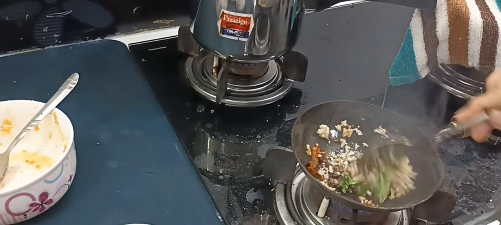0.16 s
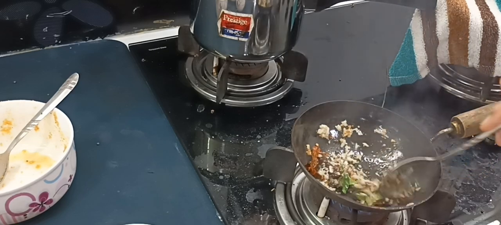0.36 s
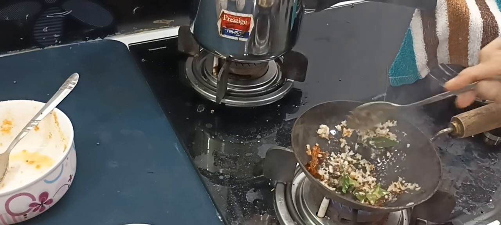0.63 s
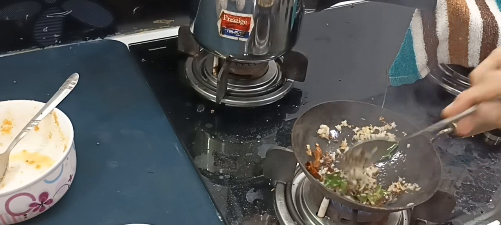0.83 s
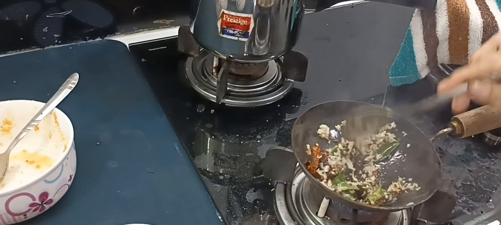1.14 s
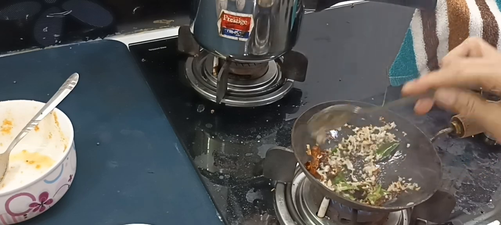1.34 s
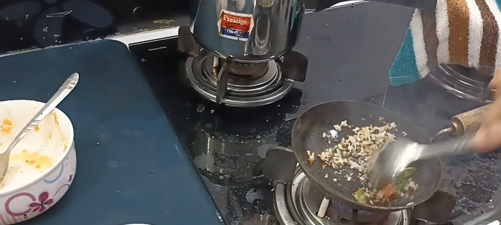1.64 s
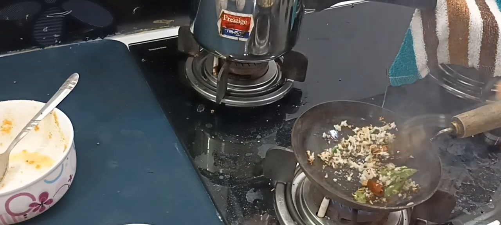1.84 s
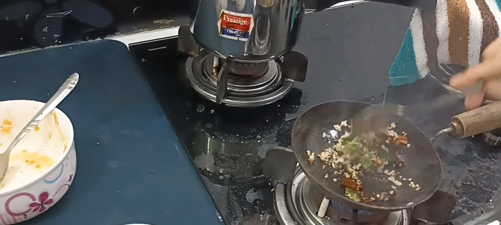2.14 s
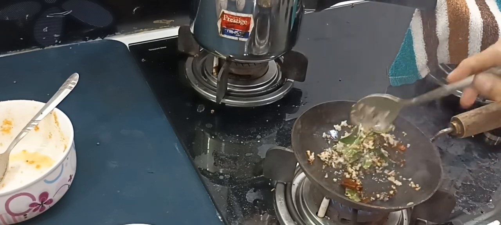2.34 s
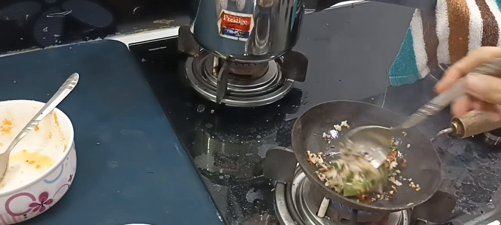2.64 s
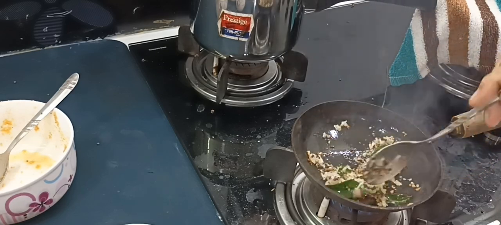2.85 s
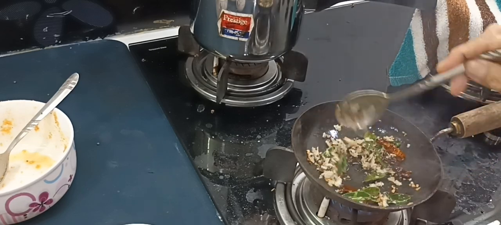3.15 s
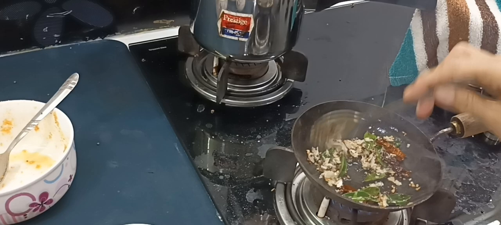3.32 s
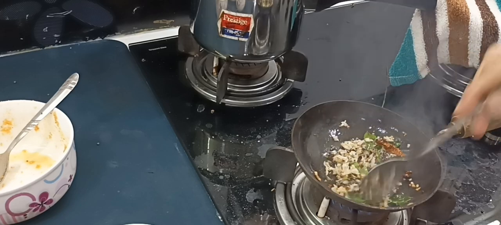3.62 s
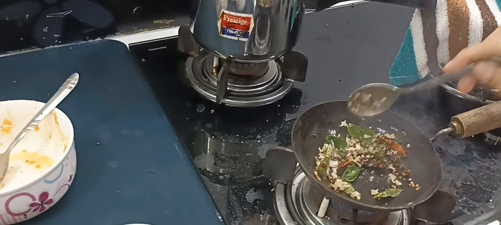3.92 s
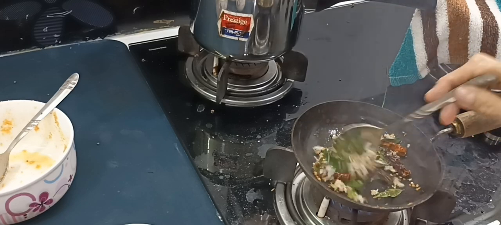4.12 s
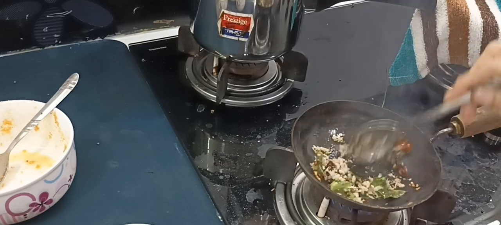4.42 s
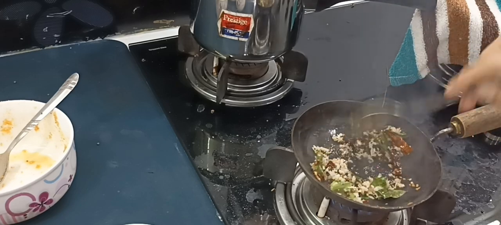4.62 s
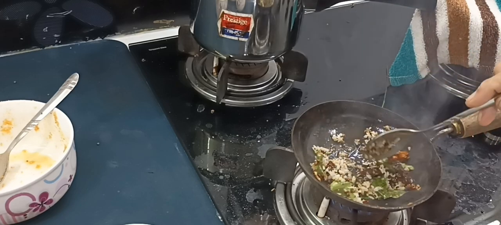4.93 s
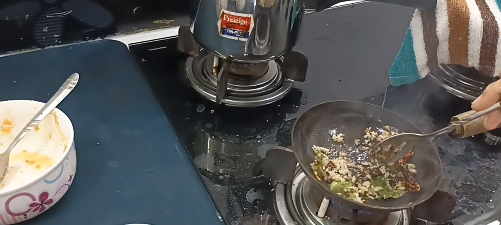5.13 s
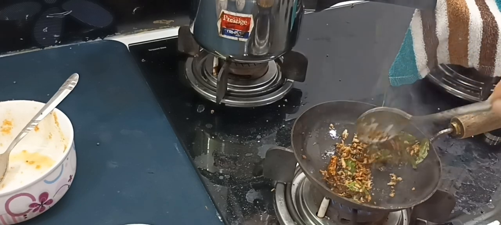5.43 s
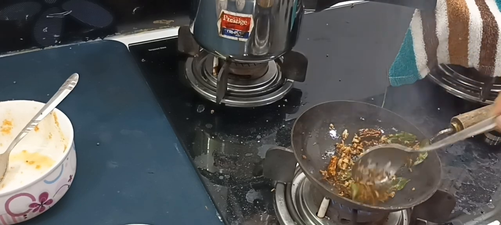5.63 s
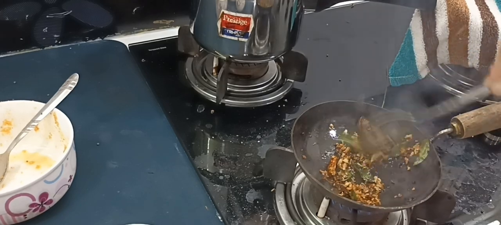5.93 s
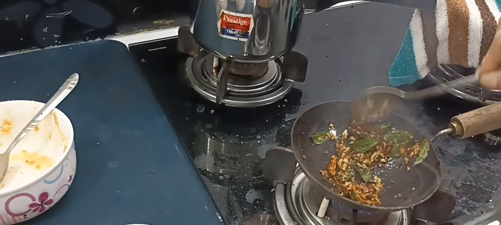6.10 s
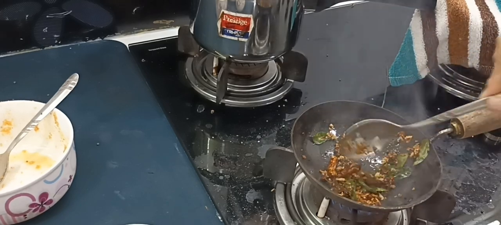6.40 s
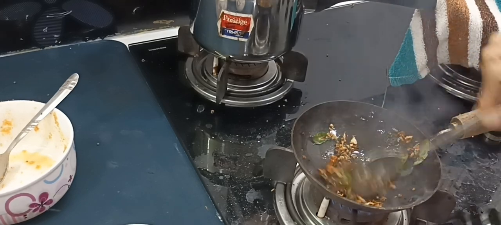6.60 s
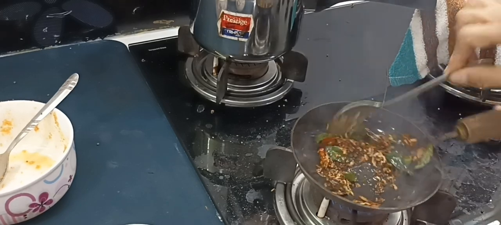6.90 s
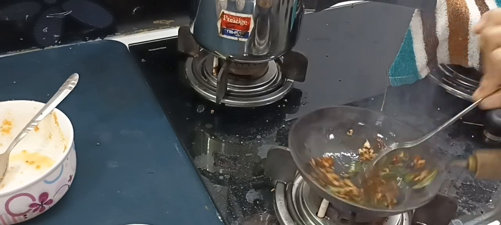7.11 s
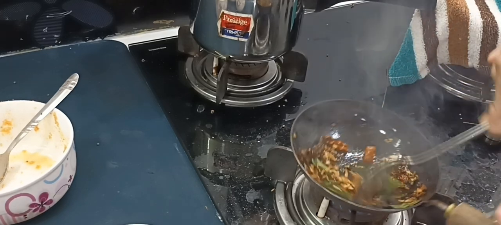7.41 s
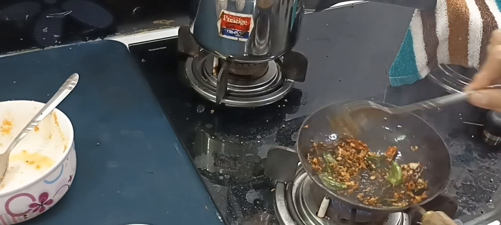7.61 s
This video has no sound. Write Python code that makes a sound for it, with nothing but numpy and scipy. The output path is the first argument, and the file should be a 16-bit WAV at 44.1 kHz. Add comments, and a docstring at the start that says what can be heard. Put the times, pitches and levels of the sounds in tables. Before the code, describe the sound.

Seeds pop and crackle in hot oil from start to finish, heard very close in a small kitchen. The cracks are bright, sharp and irregular, several each second, the louder ones trailing a short hiss over a fine sizzle and a faint gas flame. A steel spoon taps and scrapes the small pan in short ringing strokes, near the start, around 1.3 seconds, often between 2 and 4 seconds, and again at 6 seconds. Soft, low thuds and rattles come from the pan rocking on the stove. Brief hisses of steam rise at about 1, 1.4, 3.6, 5.4 and 5.9 seconds. The hardest pops, at about 4.2, 5.3, 6.3 and 7 seconds, overload the microphone with a crack and a dull thump. From 6.7 seconds the pan grinds and clanks over the grate, with a sharp spoon strike near 7.7 seconds.

```python
"""Seeds frying in a small pan

A tiled kitchen, a phone's two microphone ports close to a gas burner. Seeds crack and throw oil that
hisses as it lands; wet aromatics vent steam. A steel spoon taps and scrapes, the hob thuds, and near
the end the pan grinds over the grate. The ports ring near 10 kHz; the hardest pops overload them
and duck the limiter."""
import sys
import numpy as np
from scipy import signal
from scipy.fft import rfft, irfft
from scipy.io import wavfile
from scipy.ndimage import uniform_filter1d, minimum_filter1d

SR = 44100
rng = np.random.default_rng(int(sys.argv[2]) if len(sys.argv) > 2 else 0)


def persist_wave(psi):
    """Save psi, clipped to +-1, as 16-bit WAV."""
    counts = np.round(np.clip(psi, -1, 1) * 32767).astype(np.int16)
    wavfile.write(sys.argv[1], SR, np.atleast_2d(counts).T)


N = 341951
TIME = np.arange(N) / SR
HOB_HZ = 144  # the hob's low mode


def amp(db):
    """Decibels to amplitude."""
    return 10 ** (np.asarray(db) / 20)


def unit(x):
    """Scale to rms 1."""
    return x / np.sqrt(np.mean(x ** 2) + 1e-20)


def add(track, start_s, sound):
    """Mix a sound into a track."""
    i = max(int(start_s * SR), 0)
    track[..., i:i + sound.shape[-1]] += sound[..., :max(N - i, 0)]


def colour(x, points, size=1024):
    """Minimum-phase filter of unit power gain, shaped by (freq_hz, level_db) points."""
    hz, db = np.transpose(points)
    bins_hz = np.arange(size + 1) * SR / 2 / size
    log_gain = np.log(amp(np.interp(np.log(bins_hz + 1), np.log(hz), db)))
    cepstrum = irfft(log_gain)[:size]
    cepstrum[1:] *= 2
    response = irfft(np.exp(rfft(cepstrum, 2 * size)))[:size]
    response = np.array(response / np.linalg.norm(response), ndmin=x.ndim)
    return signal.oaconvolve(x, response, axes=-1)[..., :x.shape[-1]]


def resonate(x, hz, width_hz):
    """One resonance, gain 1 at its centre."""
    return signal.lfilter(*signal.iirpeak(hz, hz / width_hz, fs=SR), x)


def noise_band(hz, width_hz):
    """Noise passed twice through one resonance, rms 1."""
    return unit(resonate(resonate(rng.standard_normal(N), hz, width_hz), hz, width_hz))


def ring(x, modes, spread_db=2):
    """Ring a set of modes at unit power gain; their strengths depend on the point of contact."""
    longest_s = max(t60 for *_, t60 in modes)
    t, response = TIME[:int(SR * min(longest_s, .4))], 0
    for (hz, db, t60), (size, phase, lead) in zip(modes, rng.standard_normal((len(modes), 3))):
        angle = 2 * np.pi * (hz * t + phase) + np.array([[0], [lead]])  # out of step at the two ports
        decay = amp(db + spread_db * size - 60 * t / t60) / np.sqrt(t60)
        response = response + decay * np.sin(angle)
    return signal.oaconvolve(x[None], unit(response) / np.sqrt(len(t)), axes=-1)[:, :len(x)]


def wander(per_s):
    """A random line that turns per_s times a second, rms 1."""
    step = int(SR / per_s)
    stairs = np.repeat(rng.standard_normal(N // step + 2), step)
    return unit(uniform_filter1d(stairs, step)[:N])


def clicks(per_s, spread_db):
    """Random clicks, many small and a few large, rms 1."""
    chance, sign = rng.random(N) * SR / per_s, rng.choice([-1., 1.], N)
    at, out = chance < 1, np.zeros(N)
    out[at] = sign[at] * amp(spread_db * np.minimum(-np.log(chance[at]), 6))
    return unit(out)


def scattered(per_s, spread_db, apart=1.0):
    """Clicks from all over the pan: the ports share some and hear others alone."""
    shared = clicks(per_s, spread_db)
    alone = np.array([clicks(per_s, spread_db) for _ in range(2)])
    return unit(shared + apart * alone)


def leftward(db):
    """Port gains: the left faces the stove, the right is db quieter."""
    return np.array([[1], [amp(-db)]])


def burner():
    """The gas flame's soft, steady rush."""
    # Flame spectrum: freq_hz, level_db
    flame_spectrum = [(25, -8.5), (60, -5.5), (140, 1), (250, -4), (500, -4), (900, -15), (2000, -18.5),
                      (6000, -64), (16000, -30)]
    noise = rng.standard_normal(N) + .5 * rng.standard_normal((2, N))
    return colour(noise, flame_spectrum) * amp(-52.5 + 0.073 * wander(5.6)) * leftward(4.9)


def sizzle(bursts, rise_s=0.07, fall_s=0.087, simmer_db=-45, opening_db=-37):
    """Tiny bubbles burst all the time; oil thrown by each pop lands and boils off."""
    # Spectrum of bubbling oil: freq_hz, level_db
    oil_spectrum = [(200, -21), (1000, -9.5), (2500, 0.5), (5000, 2.5), (8000, 1.5), (10000, 2),
                    (13000, 0.5), (16000, -2.5)]
    t = TIME[:SR]
    power = (amp(opening_db) * np.exp(-TIME / fall_s)) ** 2  # oil already in the air at the start
    for start_s, *_, hiss_db in bursts:
        spray = amp(hiss_db) * (1 - np.exp(-t / rise_s)) * np.exp(-t / fall_s)
        add(power, start_s, spray ** 2)
    boil = np.sqrt(power + amp(simmer_db + 0.38 * wander(3.7)) ** 2)
    # bubbles come in clusters, and a few are large enough to tick alone
    bubbles = scattered(per_s=14000, spread_db=2.2) * amp(1.8 * wander(45))
    ticks = amp(-14.5) * scattered(per_s=450, spread_db=2)
    return colour((bubbles + ticks) * boil, oil_spectrum) * leftward(3.35)


def droplets():
    """Lone droplets spit; the bigger they are, the lower they tick."""
    sizes = [(3000, 31, -59.5), (6000, 110, -61), (9100, 70, -54)]  # pitch_hz, rate_per_s, level_db
    spits = 0
    for hz, per_s, db in sizes:
        ticks = scattered(per_s, spread_db=3.4, apart=0.81)
        spits = spits + amp(db) * unit(resonate(ticks, hz, hz / 2))
    return spits * leftward(8)


def spoon(attack_share=0.015, knock_s=0.0046, tap_s=0.011, chatter_db=3, chatter_per_s=260):
    """The spoon's edge knocks on the pan, then sticks and slips over it, ringing both."""
    # Each stroke bites, then drags on lightly and sings (drag_db is relative to the bite):
    # start_s, bite_s, spoon_db, pan_db, drag_s, drag_db, sing_hz, sing_db
    strokes = [(0.069, 0.012, -20.5, -39.5, 0.13, -13.5, 6530, 0),
               (0.327, 0.012, -25.5, -57, 0.019, -14, 6360, 6),
               (0.368, 0.011, -18, -30.5, 0.021, -21, 6400, 8),
               (1.252, 0.0095, -24, -34.5, 0.17, -22, 6410, -1),
               (1.882, 0.019, -49, -38.5, 0.038, -3.5, 6430, -6),
               (2.295, 0.12, -40, -49, .16, -1, 5800, -5), (2.403, 0.02, -25, -58, 0.2, -22.5, 6400, 5),
               (2.874, 0.003, -27.5, -61, 0.028, -8, 6600, -9),
               (2.935, 0.019, -20, -38, 0.13, -17.5, 6520, 0),
               (3.225, 0.014, -18.5, -31, 0.073, -15.5, 10140, -7),
               (3.29, 0.017, -25.5, -40, 0.016, -1.5, 8900, 0),
               (3.314, 0.0025, -17.5, -27, 0.0075, -25, 10400, -8),
               (3.912, 0.02, -14.5, -29, 0.14, -18, 6400, -4),
               (6.056, 0.017, -38, -31, 0.041, -18, 8600, -4),
               (6.121, 0.057, -30.5, -40, 0.09, -6.5, 8450, -3),
               (6.15, 0.069, -25, -63, 0.056, -16, 11820, -6),
               (7.278, 0.0068, -22.5, -25.5, 0.0083, -3, 5170, 7),
               (7.292, 0.036, -39.5, -42.5, 0.29, -3, 10170, -4),
               (7.669, 0.01, -10, -20, 0.067, -19.5, 10015, 0)]
    # Spoon modes, damped by hand and food: pitch_hz, level_db, t60_s
    spoon_modes = [(5300, -6, 0.04), (5740, -7, 0.03), (6450, 0, 0.06), (6950, -7, 0.025), (7820, -4, 0.06),
                   (8280, -5, 0.035), (8450, -4, 0.035), (8720, -3, 0.025), (8930, -2, 0.035),
                   (9680, -3, 0.035), (10060, -1, 0.035), (10310, -1, 0.04), (10700, -1, 0.04),
                   (11080, -6, 0.02), (11830, 1, 0.03), (13340, -8, 0.03)]
    # Spectrum of the edge's rasp: freq_hz, level_db
    rasp_spectrum = [(500, -0.5), (2200, 2.5), (4400, 0), (5500, 8.5), (7500, 0.5), (9000, -3.5),
                     (11800, -2), (13000, -2), (16000, 0)]
    steel, bites, drags = np.zeros((2, N)), np.zeros(N), np.zeros(N)
    t = TIME[:SR // 3]
    slips = clicks(per_s=2900, spread_db=2) * amp(chatter_db * wander(chatter_per_s))
    for k, stroke in enumerate(strokes):
        start_s, bite_s, spoon_db, pan_db, drag_s, drag_db, sing_hz, sing_db = stroke
        contact = 1 - np.exp(-t / (attack_share * bite_s))  # long strokes lean in softly
        bite = contact * np.exp(-(t / bite_s) ** 3)
        drag = contact * np.exp(-(t / drag_s) ** 3) * amp(drag_db)
        pressure = np.maximum(bite, drag)
        rub = unit(slips[k * SR // 10:][:len(t)] * pressure)
        knock = unit(rng.standard_normal(len(t)) * np.exp(-t / knock_s))
        knock *= amp(15) * np.exp(-bite_s / tap_s)  # the shorter the bite, the more of it is knock
        force = unit(rub + knock) * np.sqrt(np.mean(pressure ** 2))
        scrape = amp(-3) * (ring(force, spoon_modes) + colour(force, rasp_spectrum)) * leftward(6.7)
        # a light edge sings more readily than a hard-pressed one
        song = squeal(sing_hz, len(t)) * amp(sing_db) * np.maximum(amp(-6) * bite, drag)
        add(steel, start_s, amp(spoon_db) * (scrape + song))
        add(bites, start_s, amp(pan_db + 1) * bite)
        add(drags, start_s, amp(pan_db + 6) * drag)
    # the bare edge wakes the pan's high modes; dragged through food it sounds hollow
    bright = pan_body(bites, slips_per_s=1200, tilt_db_per_octave=1.7, clatter_db=-6.5)
    hollow = pan_body(drags, slips_per_s=700, tilt_db_per_octave=-2.5, clatter_db=0)
    return steel + bright + hollow


def squeal(hz, samples, width_hz=120):
    """A narrow, unsteady tone while the spoon's edge keeps slipping in step with a mode."""
    tone = resonate(rng.standard_normal(SR // 2), hz, width_hz)
    return unit(tone[-samples:]) * leftward(8)


def pan_body(force, slips_per_s, tilt_db_per_octave, clatter_db, contacts=2, detune=0.0035):
    """A rough push rings the pan over a food-damped clatter; harder contact tilts the modes brighter."""
    # Pan modes: pitch_hz, level_db, t60_s
    pan_modes = [(377, 0.5, 0.3), (456.8, 4, 0.23), (505, 4, 0.096), (645.6, 2, 0.14), (723, -4, 0.077),
                 (766, -4, 0.11), (830, -6, 0.08), (980, -3, 0.048), (1178, -5.5, 1), (1204, -2.5, 0.1),
                 (1313, -4, 0.074), (1403, -4.5, 0.063), (1530, -3.5, 0.038), (1660, -3, 0.11),
                 (2064, -0.5, 0.046), (2144, -1.5, 0.017), (2254, -5, 0.04), (2394, -8.5, 0.04),
                 (2565, -6.5, 0.043), (3074, -3, 0.053), (3325, -8.5, 0.077), (3446, -11.5, 0.042),
                 (3850, -8, 0.033), (4270, -11, 0.07), (4370, -8, 0.039), (5160, -11, 0.028)]
    # Spectrum of the clatter: freq_hz, level_db
    clatter_spectrum = [(100, -47), (250, 1), (480, -2), (800, -2.5), (1300, -11.5), (1800, -4.5),
                        (2300, -33), (2800, -9), (4600, -28), (6000, -28), (16000, -30)]
    metal = 0
    # the load shifts between points of contact; each rings and detunes the modes differently
    for offsets in rng.standard_normal((contacts, len(pan_modes))):
        modes = [(hz * (1 + detune * offset), db + tilt_db_per_octave * np.log2(hz / 1000), t60)
                 for (hz, db, t60), offset in zip(pan_modes, offsets)]
        slips = unit(clicks(slips_per_s, spread_db=0) * amp(3 * wander(per_s=12)))
        metal = metal + ring(force * slips, modes) / np.sqrt(contacts)
    clatter = colour(force * scattered(per_s=2400, spread_db=3.5), clatter_spectrum)
    return (amp(1) * metal + amp(clatter_db) * clatter) * leftward(5.8)


def hob(push_s=0.012, rattle_s=0.013, lead_s=.008, scuff_db=-12):
    """Pushes of the spoon swing the hob's low mode and rattle the hollow pan on its grate."""
    # Pushes that rock the pan: time_s, level_db
    pushes = [(0.083, -46.5), (0.17, -49.5), (0.346, -48), (0.65, -50), (0.695, -50), (0.935, -55),
              (1.062, -42), (1.268, -48.5), (1.438, -48), (1.895, -38), (1.94, -46), (2.001, -47),
              (2.261, -38.5), (2.998, -41), (3.236, -33.5), (3.608, -39.5), (3.673, -40), (3.929, -41.5),
              (4.36, -38), (4.431, -49.5), (4.596, -40), (4.689, -52), (4.841, -57.5), (5.559, -49.5),
              (5.736, -41), (6.057, -45.5), (6.49, -48), (6.622, -45.5), (6.91, -38.5), (7.115, -38),
              (7.258, -40), (7.405, -39), (7.583, -32)]
    # Hollow resonances of the pan: pitch_hz, width_hz, level_db
    hollow = [(230.3, 14, -9.5), (308.7, 24, -5), (376, 37, -8), (477, 56, -4.5), (764, 250, -12)]
    t, swing, rattle = TIME[:SR // 4], np.zeros(N), np.zeros(N)
    thud_shape = t / push_s * np.exp(1 - t / push_s)
    rattle_shape = t / rattle_s * np.exp(1 - t / rattle_s)
    for (time_s, db), (detune, phase) in zip(pushes, rng.uniform(-0.93, 1, (len(pushes), 2))):
        tone = np.sin(2 * np.pi * HOB_HZ * (1 + 0.11 * detune) * t + np.pi * phase)
        add(swing, time_s - lead_s, amp(db) * thud_shape * tone)
        add(rattle, time_s - lead_s, amp(db) * rattle_shape)
    clatter = sum(amp(db) * noise_band(hz, width_hz) for hz, width_hz, db in hollow)
    scuff = pan_body(amp(scuff_db) * rattle, slips_per_s=550, tilt_db_per_octave=3, clatter_db=0)
    return amp(9) * swing * leftward(2.5) + rattle * clatter * leftward(5.8) + scuff


def seeds(small_count=50, spread_db=2.5):
    """The seeds that burst: loud ones at set times, small ones at random between them."""
    # Loud seeds (puff_db is relative to the crack): start_s, crack_db, puff_db, hiss_db
    loud = [(0.0775, -10.5, -15, -22), (0.167, -24.5, -11, -45), (0.2325, -23.5, -28, -28.5),
            (0.3087, -16, -21, -22), (0.331, -24.5, -3, -42), (0.355, -21, -5, -43),
            (0.3953, -5.5, -15.5, -27), (0.487, -24, -10, -42), (0.52, -24, -20, -40),
            (0.5402, -14, -9.5, -26.5), (0.6488, -24, -12, -29.5), (0.73, -29, -12, -49),
            (0.8202, -9, -14.5, -30), (0.8582, -20.5, -16.5, -31.5), (0.9137, -21.5, 1, -27),
            (1.119, -23.5, -24, -36), (1.2485, -15, -11, -29), (1.3984, -17.5, -5.5, -32),
            (1.4154, -20, -3.5, -42), (1.4786, -20, -5.5, -23), (1.707, -27.5, -8.5, -27),
            (1.7334, -23, -7, -26), (1.758, -24, -9, -45), (1.7668, -10, -5.5, -44), (1.856, -30, -10, -48),
            (1.918, -32, -20, -35), (2.0025, -26.5, -18, -35), (2.021, -31, -14, -45),
            (2.046, -27.5, -12, -47), (2.0793, -26, -11, -54), (2.1025, -9.5, -19.5, -30),
            (2.242, -30.5, -9, -35), (2.3375, -22.5, -21, -46), (2.3441, -21, -16, -35),
            (2.383, -26, -19, -45), (2.4867, -23, -6, -30), (2.5, -27, -18, -37), (2.5214, -20.5, -22, -52),
            (2.5966, -11.5, -15, -53), (2.812, -30.5, -11, -43), (2.9037, -19.5, -21, -28),
            (2.9654, -16.5, -19, -39), (3.1127, -24, -14.5, -38), (3.173, -31.5, -21, -35),
            (3.273, -24, -11, -40), (3.314, -11.5, -15, -29.5), (3.5379, -10.5, -13, -36),
            (3.549, -14.5, -19, -25.5), (3.652, -28.5, -19, -46), (3.8999, -15.5, -18, -24.5),
            (4.045, -30, -16, -40), (4.121, -32, -16, -51), (4.243, -5.5, -7, -18), (4.455, -30, -17, -37),
            (4.5281, -25, -17, -38), (4.577, -31, -7, -48), (4.6218, -11.5, -12, -44),
            (4.665, -31.5, -6, -30.5), (4.749, -35, -15, -50), (4.7873, -7, -20, -33),
            (4.91, -27.5, -31, -44), (4.9753, -21, -14, -32.5), (4.9868, -22.5, -10.5, -50),
            (5.009, -31, -12, -50), (5.1018, -29, -3.5, -29.5), (5.2287, -22, -4.5, -54),
            (5.2752, -1.5, -18, -24.5), (5.3859, -14, -1, -64), (5.4097, -21, -19, -33),
            (5.5379, -13, -15, -51), (5.695, -8.5, -5, -24.5), (5.831, -8, -4.5, -32), (6.266, -7, 0, -41),
            (6.2828, -6.5, -37, -22.5), (6.324, -29.5, -1.5, -29), (6.459, -27.5, -14, -53),
            (6.539, -31.5, -21, -45), (6.5789, -10, -15, -31.5), (6.6728, -9, -31, -31.5),
            (7.0418, -3, -15, -17.5), (7.4406, -7, -18, -24), (7.4577, -10, -20, -53)]
    starts_s = rng.random(small_count) * N / SR
    levels_db = np.array([-38, -14]) - spread_db * rng.standard_normal((small_count, 2))
    small = [(s, crack_db, puff_db, -64) for s, (crack_db, puff_db) in zip(starts_s, levels_db)]
    return list(loud) + small


def pops(bursts, crack_s=0.00028, puff_s=0.00049, echo_s=0.0085, echo_db=-12, tint_db=2.5, apart=0.97):
    """Each husk splits with a bright crack and a duller puff of steam; pan and hob throw it back."""
    # Spectrum of the splitting husk: freq_hz, level_db
    crack_spectrum = [(300, -57), (1500, -5), (4000, -9), (6200, 9.5), (8000, 5), (10000, 10), (13000, 6.5),
                      (16500, 4.5)]
    # Spectrum of the puff: freq_hz, level_db
    puff_spectrum = [(200, -10), (900, -9), (1700, 1.5), (2700, 6.5), (5000, 4), (7000, -11), (10000, -23),
                     (16000, -19)]
    t, echo_t, out = TIME[:SR // 200], TIME[:SR // 30], np.zeros((2, N))
    echo_fade = np.exp(-echo_t / echo_s) * (echo_t > .0008)
    for start_s, crack_db, puff_db, _ in bursts:
        # every seed has its own size, colour and place in the pan
        size = 2 ** (0.33 * rng.standard_normal())
        crack_shape = [(hz, db + tint_db * rng.standard_normal()) for hz, db in crack_spectrum]
        puff_shape = [(hz / size, db + tint_db * rng.standard_normal()) for hz, db in puff_spectrum]
        # the husk tears on a moment after it first gives way
        tear_t = t - rng.uniform(0.00021, 0.0035)
        tear = rng.uniform(0.2, 0.4) * (tear_t > 0) * np.exp(-np.abs(tear_t) / crack_s)
        # the two ports hear the burst from different sides
        husk, vapour = rng.standard_normal((2, 1, len(t))) + apart * rng.standard_normal((2, 2, len(t)))
        crack = colour(husk * (np.exp(-t / crack_s) + tear), crack_shape)
        puff = colour(vapour * np.exp(-t / puff_s), puff_shape)
        # loudness is set by the part of the crack that rings the ports
        crack = crack / np.std(resonate(crack, hz=10000, width_hz=2000), axis=1, keepdims=True)
        burst = (amp(-7.5) * crack + amp(puff_db + 3.5) * unit(puff)) * amp(crack_db)
        paths = rng.standard_normal((2, len(echo_t))) * echo_fade
        paths *= amp(echo_db) / np.linalg.norm(echo_fade)
        paths[:, 0] = 1  # the direct sound
        side_db = 7 + 2.5 * rng.standard_normal()
        add(out, start_s, signal.fftconvolve(paths, burst, axes=-1) * leftward(side_db))
    return out


def steam():
    """Wet pieces vent with a darker hiss that swells and dies."""
    # Jets of steam: start_s, length_s, level_db
    jets = [(0.942, 0.19, -37.5), (1.391, 0.35, -35.5), (3.573, 0.21, -40.5), (5.379, 0.19, -33.5),
            (5.866, 0.29, -30.5)]
    # Spectrum of a jet: freq_hz, level_db
    jet_spectrum = [(300, -53), (1200, -1.5), (2500, 5), (4200, 6.5), (5800, 5.5), (7500, -7.5),
                    (10000, -49), (16000, -28)]
    flow = np.zeros(N)
    for start_s, length_s, db in jets:
        progress = np.linspace(0, 1, int(length_s * SR))
        add(flow, start_s, amp(db) * np.sin(np.pi * progress ** 0.24))
    return colour(flow * scattered(per_s=18000, spread_db=3.5), jet_spectrum) * leftward(2.3)


def overloads(mean_s=0.035, settle_hz=24, rasp_s=0.0017):
    """An overloaded port jumps raggedly to one side and creeps back: a crack and a dull thud."""
    # The hardest bursts (swings are signed, full scale 1):
    # start_s, left_swing, right_swing, ragged_share, rasp_hz
    jumps = [(4.244, 1.5, 1.53, 0.36, 3200), (5.2755, 3.5, 5, 0.6, 3700), (6.2667, 7.5, 1.3, 0.74, 640),
             (6.283, 0.16, 1.85, 0.27, 1200), (7.0422, -5, -1.6, 0.26, 1700)]
    t, out = TIME[:SR // 10], np.zeros((2, N))
    swing = (1 - np.exp(-t / .0001)) * np.exp(-(t / .0036) ** 1.2)
    for start_s, left, right, ragged_share, rasp_hz in jumps:
        # the burst's own vibration pulls the port briefly off its stop
        vibration = unit(resonate(rng.standard_normal((2, len(t))), rasp_hz, 0.83 * rasp_hz))
        pull = ragged_share * np.clip(vibration, 0, 2) * np.exp(-t / rasp_s)
        add(out, start_s, np.array([[left], [right]]) * swing * (1 - pull))
    # the bass cut takes away the running mean: a sag before the jump, a swing past rest after it
    creep = signal.lfilter(*signal.butter(1, settle_hz, "low", fs=SR), out)
    window = np.hanning(2 * int(mean_s * SR / 2) + 1)
    sag = signal.oaconvolve(out, window[None] / window.sum(), mode="same", axes=-1)
    return out - .5 * (creep + sag)


def pan_slide(judder_db=3, judder_per_s=60, catch_s=0.0021):
    """The pan judders across the grate, catches now and then with a clank and shakes the hob."""
    # Grinding force along the slide: time_s, level_db
    slide = [(6.721, -75), (6.74, -36.5), (6.8, -51), (6.83, -35), (7.0, -32), (7.12, -28.5), (7.21, -30),
             (7.41, -30.5), (7.452, -32), (7.6, -36), (7.75, -35)]
    # Catches on the grate: start_s, level_db
    catches = [(6.733, -28.5), (6.816, -23.5), (7.135, -20), (7.2528, -16), (7.348, -17.5), (7.496, -28),
               (7.577, -15), (7.587, -41)]
    times_s, levels_db = np.transpose(slide)
    force = np.interp(TIME, times_s, amp(levels_db), left=0) * amp(judder_db * wander(judder_per_s))
    jolts = np.zeros(N)
    for start_s, db in catches:
        add(jolts, start_s, amp(db) * np.exp(-TIME[:SR // 10] / catch_s))
    rumble = amp(-1) * force * noise_band(HOB_HZ, width_hz=42)
    rattle = pan_body(amp(3) * force, slips_per_s=170, tilt_db_per_octave=-0.6, clatter_db=-4)
    clanks = pan_body(amp(6) * jolts, slips_per_s=3500, tilt_db_per_octave=1, clatter_db=-4)
    return rattle + clanks + rumble * leftward(2.6)


def kitchen(x, t60_s=0.093, room_db=-12):
    """The tiled room adds a short, diffuse tail."""
    t = TIME[:SR // 3]
    fade = amp(-60 * t / t60_s) * (t > .005)
    response = amp(room_db) * rng.standard_normal((2, len(t))) * fade / np.linalg.norm(fade)
    return x + signal.oaconvolve(x, response, axes=-1)[:, :N]


def ports(x, cavities_hz=(9800, 10600), width_hz=1300, boost=4.71):
    """Each microphone port is a small cavity with its own treble resonance."""
    return .5 * np.array([side + boost * resonate(side, hz, width_hz)
                          for side, hz in zip(x, cavities_hz)])


def scene(left_lag_s=.00086):
    """Frying, stirring and the stove from close by; the left port hears them slightly later."""
    bursts = seeds()
    frying = pops(bursts) + sizzle(bursts) + droplets() + steam()
    stirring = spoon() + pan_slide()
    left, right = ports(kitchen(frying + stirring)) + hob() + burner() + overloads()
    lag = round(left_lag_s * SR)
    return np.array([np.pad(left, (lag, 0))[:N], right])


def record(dry, ceiling=0.89, look_ahead_s=.019, top_hz=16000):
    """The phone's look-ahead limiter ducks both channels around each peak; the top is cut."""
    peak = np.maximum(np.abs(dry).max(axis=0), ceiling)
    ahead = int(look_ahead_s * SR)
    held_log_gain = minimum_filter1d(np.log(ceiling / peak), 2 * ahead + 1)
    gain = np.exp(uniform_filter1d(held_log_gain, ahead // 2))
    top_cut = signal.ellip(8, .2, 70, top_hz, fs=SR, output="sos")
    return signal.sosfilt(top_cut, dry * gain)


dry = scene()
out = record(dry)
persist_wave(out)
```